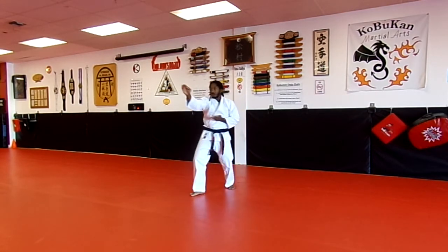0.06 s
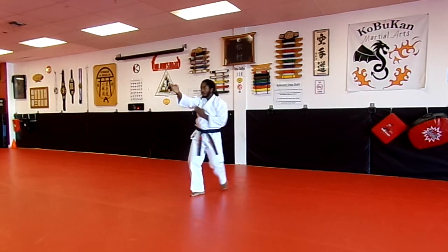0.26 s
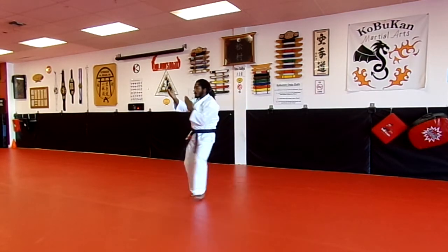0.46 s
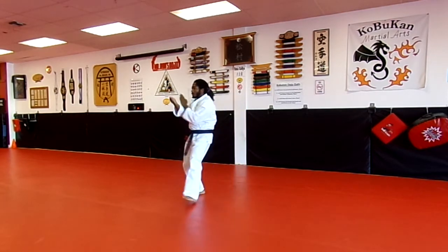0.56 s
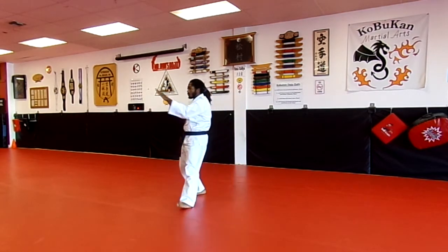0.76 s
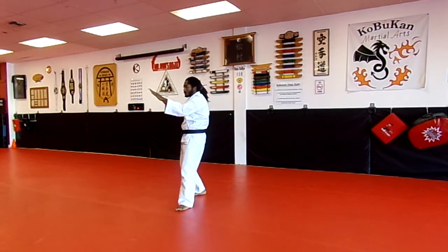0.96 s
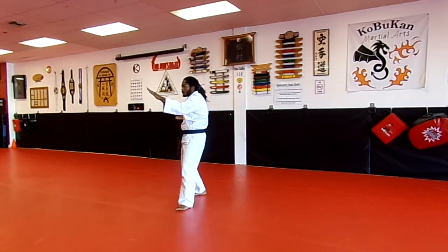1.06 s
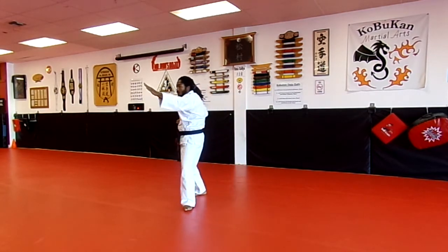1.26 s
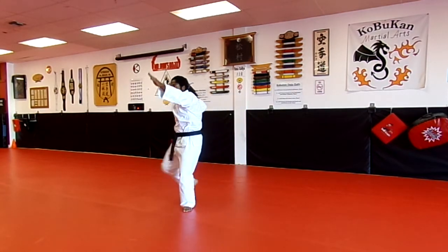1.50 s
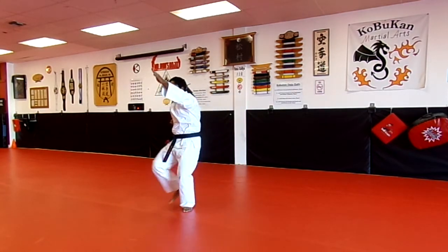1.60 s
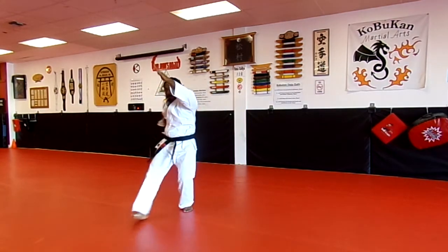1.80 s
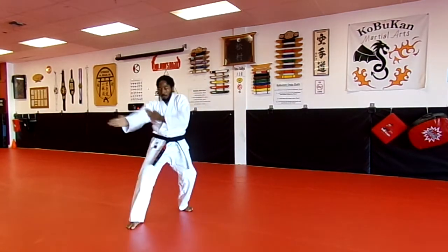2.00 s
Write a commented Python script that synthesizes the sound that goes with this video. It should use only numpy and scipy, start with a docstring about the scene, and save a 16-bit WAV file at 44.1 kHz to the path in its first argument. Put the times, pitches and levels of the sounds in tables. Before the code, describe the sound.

Faint swishes of a heavy cotton uniform and bare feet on mats, with small ticks, then one loud, dry sleeve crack near the end; soft ventilation, short room echo, small camera microphone some metres away.

```python
"""Cloth in a matted hall

A lone fighter moves through a form in a matted hall, some metres from a small camera. Heavy cotton and
bare feet swish as gritty bands of noise; folds tick, and one sleeve cracks taut, as brief damped rings
with a spit of noise. The hall answers with wall echoes and a decaying tail. Ventilation adds soft noise
and wavering hum lines; the camera housing cuts narrow notches in the treble and rings low down.
"""
import sys
import numpy as np
from scipy import signal
from scipy.fft import rfft, irfft, next_fast_len
from scipy.io import wavfile
from scipy.ndimage import map_coordinates

SR = 44100
rng = np.random.default_rng(int(sys.argv[2]) if len(sys.argv) > 2 else 0)


def materialize(psi):
    """Save the field psi as 16-bit PCM at rate SR to the path in sys.argv[1].

    A 1-D psi becomes a single channel; in a 2-D psi each row is a channel.
    """
    bounded = np.clip(np.atleast_2d(psi).T, -1, 1)
    quanta = np.round(bounded * 32767).astype(np.int16)
    wavfile.write(sys.argv[1], SR, quanta)


def gain_from_decibels(decibels):
    """Convert decibel values to linear amplitude factors."""
    exponent = np.asarray(decibels, float) / 20
    return 10 ** exponent


N = 90184  # length [samples]

# Spectral shape of the ventilation noise: (frequency [Hz], relative density [dB])
AIR_SHAPE = [(24, -28), (50, -9.5), (100, -9.5), (300, -11), (450, -21), (1000, -25), (1800, -27.5),
             (4000, -28.5), (9000, -34), (16000, -29)]
# Ventilation hum lines: (frequency [Hz], level before a common gain [dB])
HUM_LINES = [(119.8, -57.5), (211, -65.5), (264, -67)]
# Decay of the hall's tail: (frequency [Hz], time to fall 60 dB [s])
HALL_DECAY = [(120, 0.69), (500, 0.55), (1500, 0.5), (4000, 0.39), (8000, 0.36), (11000, 0.34),
              (15000, 0.2)]
# First echoes from the walls: (delay [s], level re direct sound [dB])
WALL_ECHOES = [(.0095, -14), (0.0205, -23), (0.025, -15), (.033, -21)]
# Strokes of cotton and bare feet: (start [s], rise [s], hold [s], time to fall 60 dB [s],
# rms level while held [dB], centre [Hz], Gaussian width [octaves])
CLOTH_STROKES = [(0.039, 0.0055, 0.02, .05, -57.5, 7950, 0.86), (0.039, 0.0074, 0.0083, .1, -63, 895, 0.53),
                 (.08, 0.028, .03, .5, -60, 350, .9), (.2, .04, .03, .2, -68, 800, .3),
                 (.14, 0.0035, .014, .05, -65, 7400, .35), (.07, .06, .3, .5, -64, 4000, 1.3),
                 (0.424, 0.028, .012, 0.11, -63, 2470, .5), (0.584, 0.025, 0.02, 0.37, -51.5, 5900, 0.82),
                 (.565, .06, 0.052, .35, -54, 2200, 1.07), (.62, 0.043, .03, 0.24, -58.5, 700, 0.63),
                 (1.05, 0.055, .04, .3, -71, 8000, 0.57), (1.303, 0.064, 0.045, 0.23, -63.5, 670, 0.63),
                 (1.7155, 0.0051, .042, 0.15, -47.5, 6500, 1.0), (1.77, 0.0029, .008, 0.5, -58, 2700, 0.75),
                 (1.901, .008, .005, .02, -36, 2200, 1.1), (1.905, .012, .02, .3, -47, 180, .8),
                 (1.917, .004, .01, .25, -33, 2400, 1.2)]
# Folds that tick or crack taut: (start [s], approximate ring peak before dulling [dB], pitch [Hz],
# length [cycles])
TAUT_FOLDS = [(.056, -48, 9000, 3), (.62, -50, 4700, 30), (.649, -51, 2850, 25), (.661, -51, 3350, 30),
              (1.354, -55, 7500, 4), (1.367, -47, 7950, 4), (1.371, -52, 9500, 3), (1.391, -49, 7500, 4.2),
              (1.740, -44, 11000, 2.4), (1.7755, -36, 5000, 2), (1.7754, -45, 2870, 6.9),
              (1.8005, -43, 2800, 3), (1.862, -52, 2630, 5.1), (1.9118, -24, 458, 4),
              (1.9143, -4.5, 5134, 5.1), (1.9141, -9, 8600, 4), (1.915, -2.5, 6760, 3.36),
              (1.9151, -11.5, 2120, 3.2), (1.9160, -11.5, 1480, 4.3), (1.9168, -9.5, 3240, 6.2),
              (1.9180, -14, 1905, 2.7), (1.9194, -10.5, 4970, 3.3), (1.9183, -9.5, 7050, 2.6),
              (1.9219, -17, 1290, 2.23), (1.9212, -27, 630, 4), (1.9225, -27, 760, 4)]
# Broad response of the microphone: (frequency [Hz], gain [dB])
MIC_RESPONSE = [(2000, 1), (2500, 4.5), (3300, 1.5), (4000, 3.5), (4800, -2), (5400, -3), (5750, -5),
                (7700, -5.5), (8500, -9), (10200, -21.5), (11200, -22), (12500, -18.5), (15700, -12.5)]
# Notches cut by the housing: (centre [Hz], width [Hz], depth [0-1])
HOUSING_NOTCHES = [(3666, 230, 1), (4393, 350, 1), (8040, 560, 1), (11700, 380, 1)]
# Hollow spots of the housing: (centre [Hz], width [Hz], extra linear gain [1])
HOUSING_RINGS = [(597, 22, 1.5), (627, 9.3, 1.6), (760, 29, 0.87)]


def unit(x):
    """Normalisation to unit mean-square power."""
    return x / np.sqrt(np.mean(x ** 2) + 1e-20)


def along(points, hz):
    """Interpolation of (frequency, value) points on a logarithmic frequency axis."""
    f, value = np.transpose(points)
    return np.interp(np.log(hz + 1), np.log(f + 1), value)


def wobble(rate):
    """Slow random modulation: a smooth spline through normal random knots, rate knots a second."""
    knots = rng.standard_normal(N // 20)
    return map_coordinates(knots, [np.arange(N) * rate / SR])


def filtered(x, response):
    """Linear filtering: the spectrum of x times a complex response of frequency."""
    size = next_fast_len(N + SR // 2)
    spectrum = rfft(x, size) * response(np.fft.rfftfreq(size, 1 / SR))
    return irfft(spectrum, size)[..., :N]


def ventilation():
    """Broadband flow noise of slowly varying level, with tones wavering in amplitude and phase."""
    air_db, air_waver_db = -56, 0.76
    hum_gain_db, hum_waver_db, phase_waver_rad = 2, 1.5, 0.73
    t = np.arange(N) / SR
    air = unit(filtered(rng.standard_normal(N), lambda hz: gain_from_decibels(along(AIR_SHAPE, hz))))
    hum = np.zeros(N)
    for hz, db in HUM_LINES:
        level = gain_from_decibels(db + hum_gain_db + hum_waver_db * wobble(11.85))
        phase = phase_waver_rad * wobble(7.95) + 2 * np.pi * rng.random()
        hum += level * np.sin(2 * np.pi * hz * t + phase)
    return gain_from_decibels(air_db + air_waver_db * wobble(4.33)) * air + hum


def hall(x):
    """Room response by convolution: discrete wall echoes and a tail decaying at its own rate per frequency."""
    tail_db, tail_delay_s = -12, .006  # total tail energy re direct sound
    hz, t, bins = signal.stft(rng.standard_normal(SR), SR, nperseg=256)
    decay = gain_from_decibels(-60 * t / along(HALL_DECAY, hz)[:, None])
    tail = signal.istft(bins * decay, SR, nperseg=256)[1]
    tail = gain_from_decibels(tail_db) * tail / np.linalg.norm(tail)
    response = np.pad(tail, (round(tail_delay_s * SR), 0))
    for delay, db in WALL_ECHOES:
        response[round(delay * SR)] += gain_from_decibels(db)
    return signal.fftconvolve(x, response)[:N]


def swishes():
    """Friction noise: rough fibres and passing folds modulate noise in a band under each stroke."""
    grit_db, fold_db = 2.5, 2  # unevenness of rubbing fibres, and of passing folds
    out = np.zeros(N)
    t = np.arange(N) / SR
    for start, rise, hold, fall, db, hz, octaves in CLOTH_STROKES:
        unevenness = grit_db * wobble(1500) + fold_db * wobble(70)
        fibres = rng.standard_normal(N) * gain_from_decibels(unevenness)
        band = unit(filtered(fibres, lambda f: np.exp(-.5 * (np.log2((f + 1) / hz) / octaves) ** 2)))
        swell = np.clip((t - start) / rise, 0, 1) ** 2
        decay = gain_from_decibels(-60 * np.clip(t - start - rise - hold, 0, None) / fall)
        out += gain_from_decibels(db) * swell * decay * band
    return out


def flicks():
    """Impulsive excitation: a fold pulled taut rings as a damped sine and spits broadband noise."""
    spit_db, spit_t60_s = -13, .006
    dull_hz = 10000  # low-pass corner: flicks hold little above
    out = np.zeros(N + SR)
    t = np.arange(SR // 10) / SR
    for start, db, hz, cycles in TAUT_FOLDS:
        life = t * hz / cycles  # time as a fraction of the ring's length
        envelope = 9 * life * np.exp(-3.5 * life)  # peaks near 1
        ring = np.sin(2 * np.pi * hz * t) * envelope
        spit = gain_from_decibels(spit_db - 60 * t / spit_t60_s) * rng.standard_normal(len(t))
        out[round(start * SR):][:len(t)] += gain_from_decibels(db) * (ring + spit)
    return signal.sosfilt(signal.butter(2, dull_hz, fs=SR, output="sos"), out[:N])


def scene():
    """Superposition of the direct cloth sound, its reverberation and the ventilation, in one channel."""
    cloth = swishes() + flicks()
    mix = cloth + hall(cloth) + ventilation()
    return mix[None]


def resonance(f, centre, width):
    """Second-order band-pass response, of unit gain at its centre."""
    return 1j * f * width / (centre ** 2 - f ** 2 + 1j * f * width)


def housing(f):
    """Transfer function of the microphone behind its housing: a product of band limits, notches and rings."""
    low_cut_hz, top_hz = 39, 15790
    response = gain_from_decibels(along(MIC_RESPONSE, f)) * (f < top_hz)
    response = response * (1j * f / (low_cut_hz + 1j * f)) ** 2
    for centre, width, depth in HOUSING_NOTCHES:
        response = response * (1 - depth * resonance(f, centre, width))
    for centre, width, gain in HOUSING_RINGS:
        response = response * (1 + gain * resonance(f, centre, width))
    return response


def low_pass(x):
    """Removes everything above the highest recorded frequency."""
    return signal.sosfilt(signal.butter(12, 16470, fs=SR, output="sos"), x)


def record(dry):
    """Linear pickup: the sound is filtered by the microphone and its housing."""
    picked_up = filtered(dry, housing)
    return low_pass(picked_up)


dry = scene()
out = record(dry)
materialize(out)
```